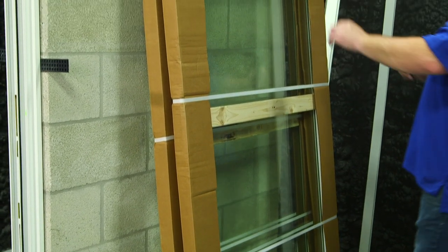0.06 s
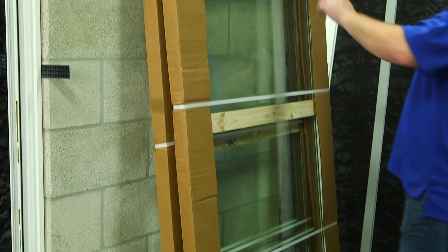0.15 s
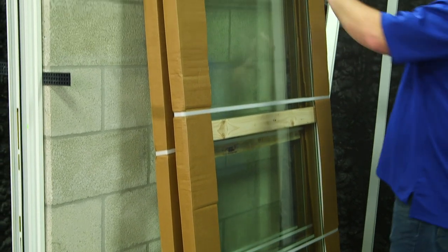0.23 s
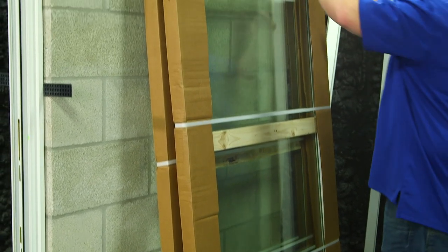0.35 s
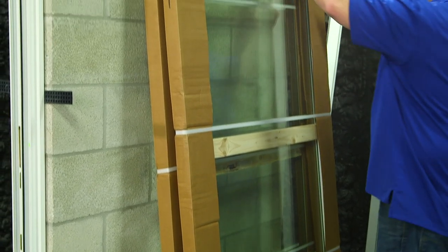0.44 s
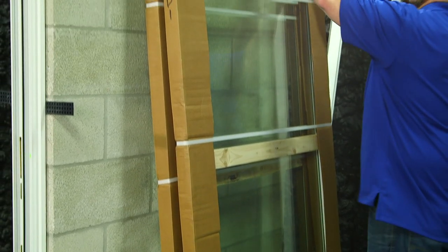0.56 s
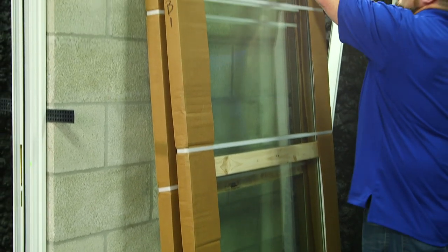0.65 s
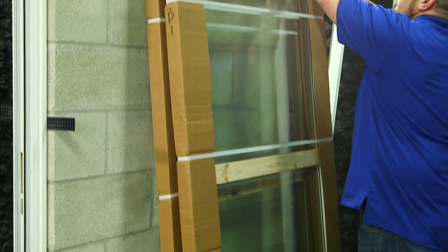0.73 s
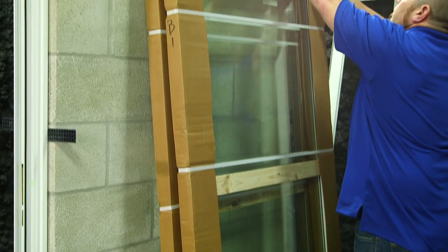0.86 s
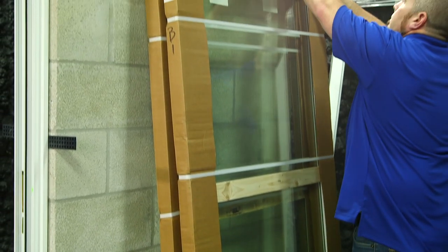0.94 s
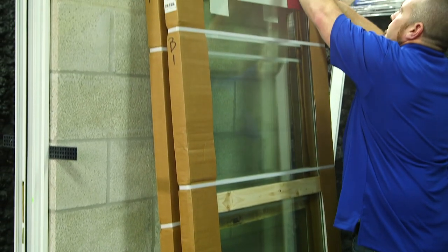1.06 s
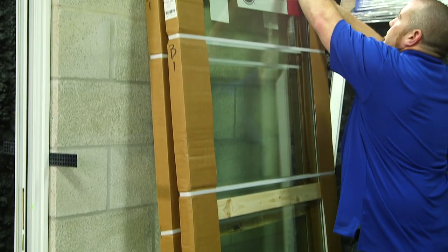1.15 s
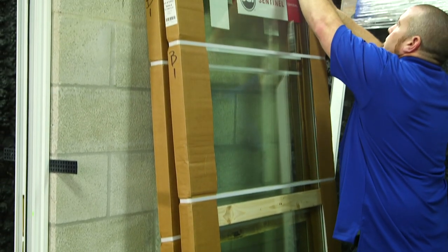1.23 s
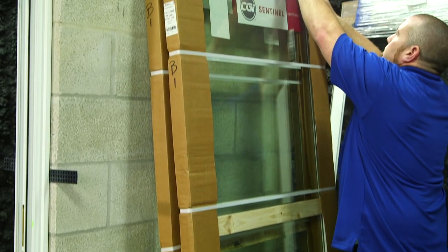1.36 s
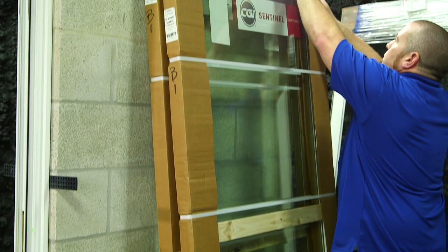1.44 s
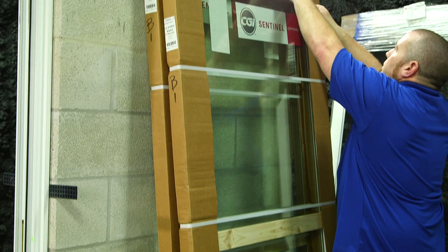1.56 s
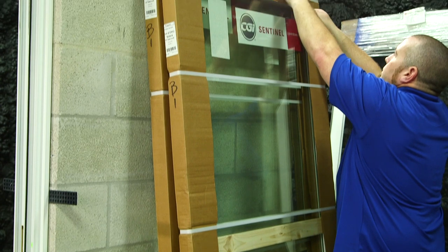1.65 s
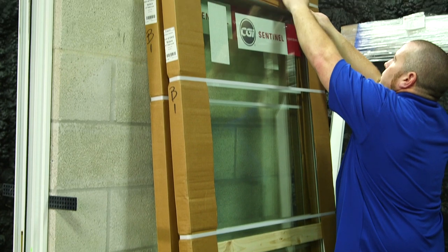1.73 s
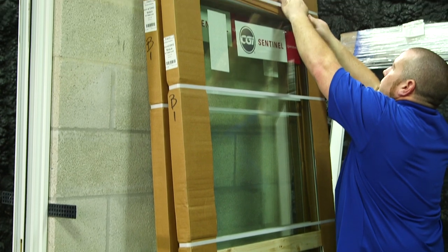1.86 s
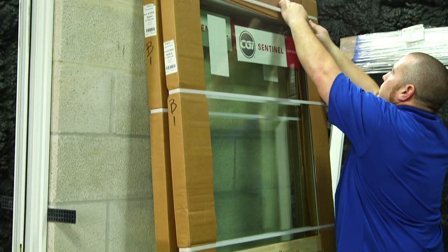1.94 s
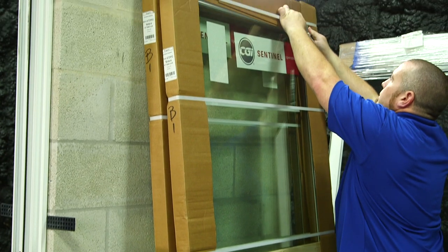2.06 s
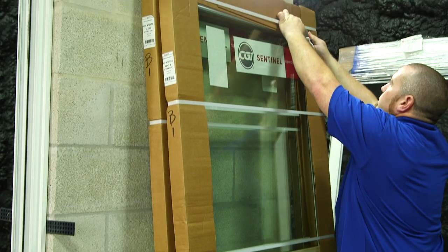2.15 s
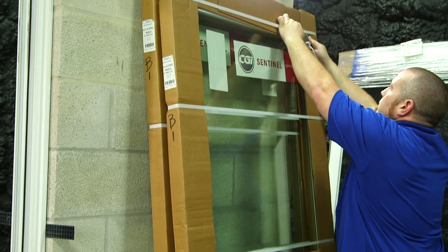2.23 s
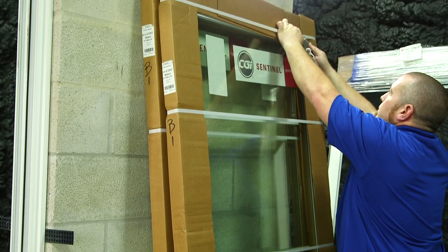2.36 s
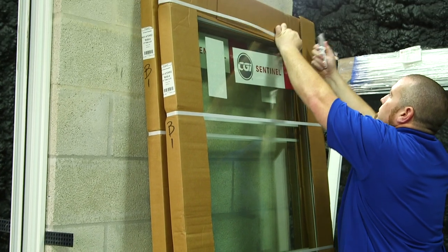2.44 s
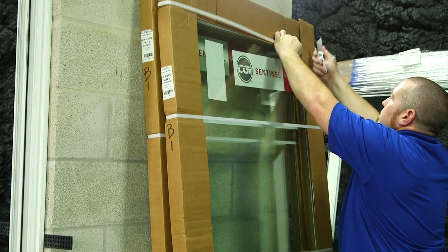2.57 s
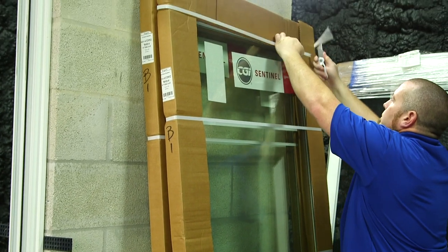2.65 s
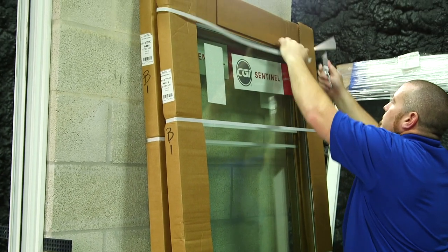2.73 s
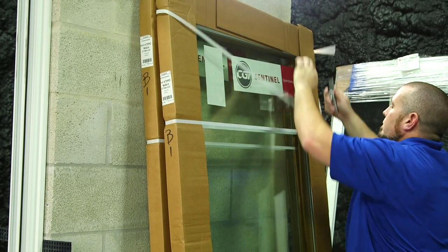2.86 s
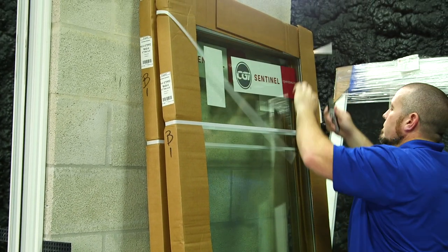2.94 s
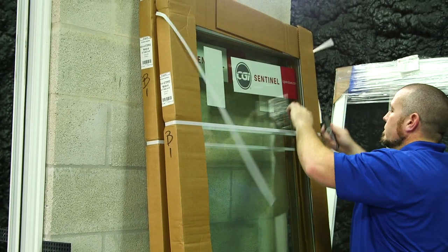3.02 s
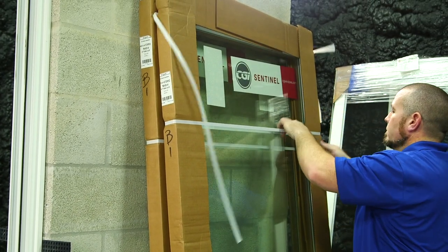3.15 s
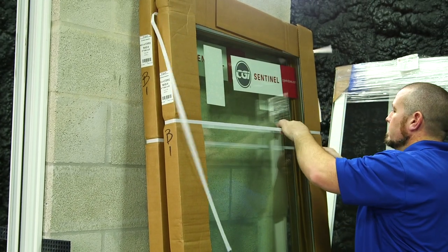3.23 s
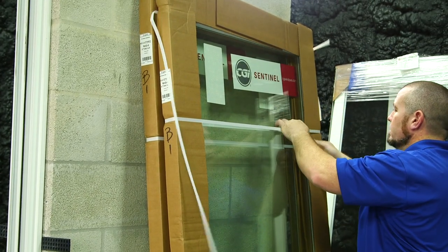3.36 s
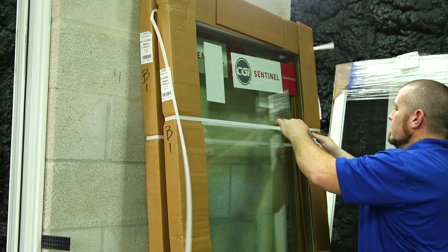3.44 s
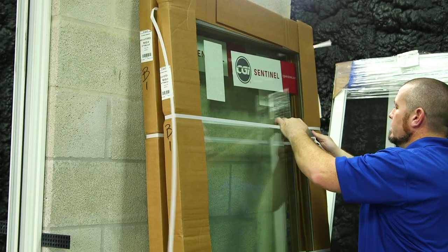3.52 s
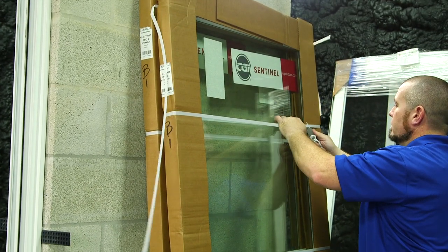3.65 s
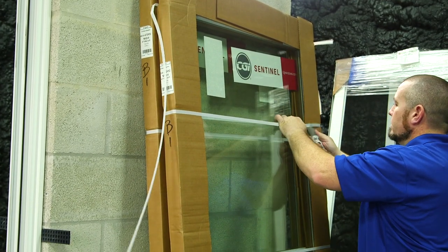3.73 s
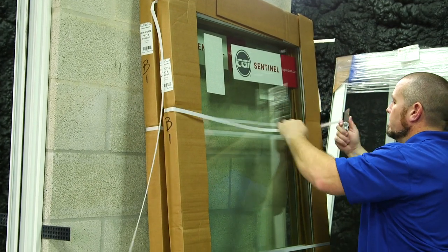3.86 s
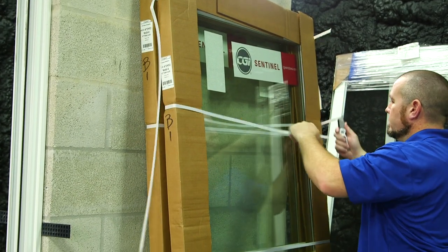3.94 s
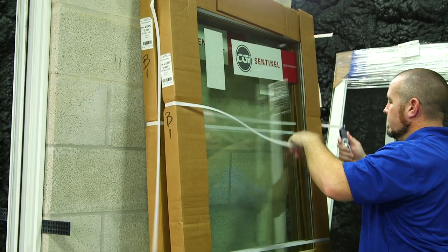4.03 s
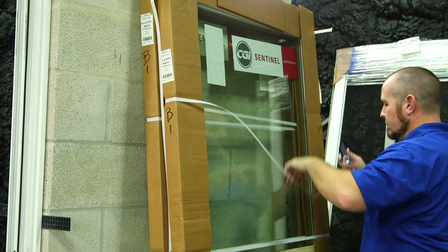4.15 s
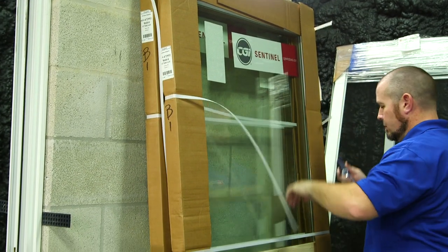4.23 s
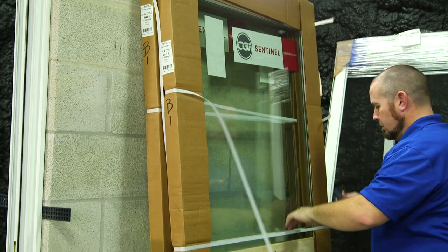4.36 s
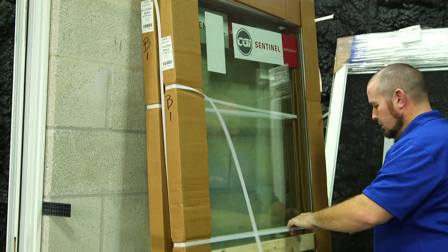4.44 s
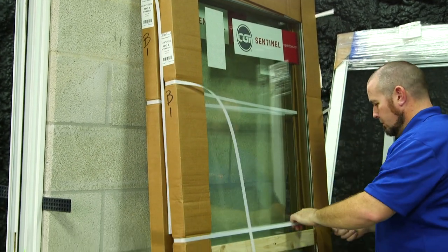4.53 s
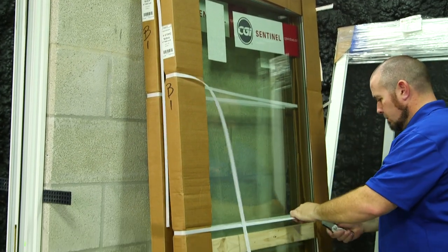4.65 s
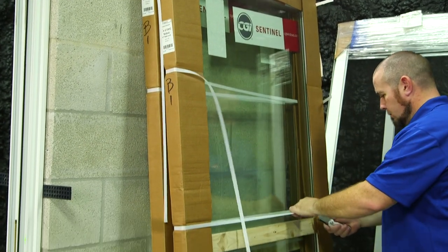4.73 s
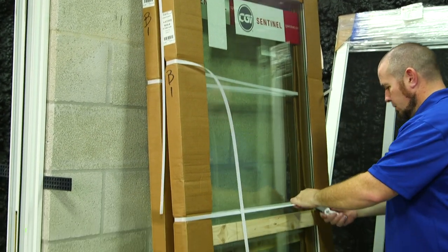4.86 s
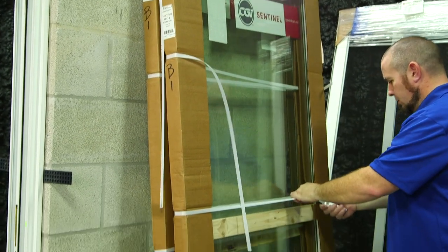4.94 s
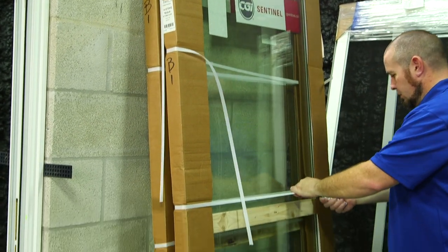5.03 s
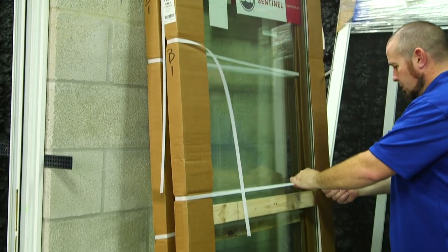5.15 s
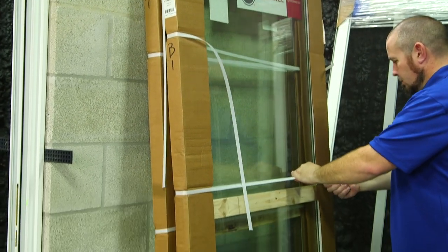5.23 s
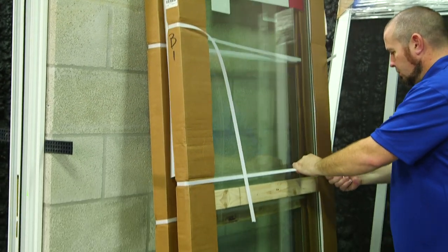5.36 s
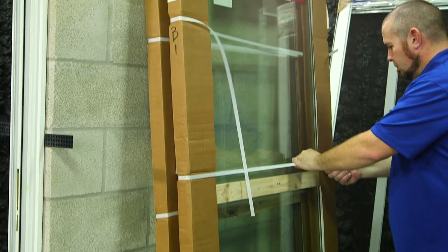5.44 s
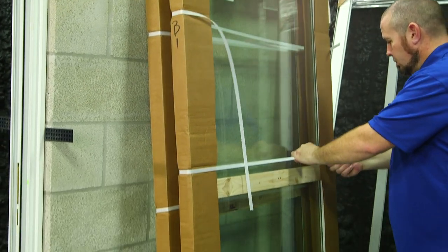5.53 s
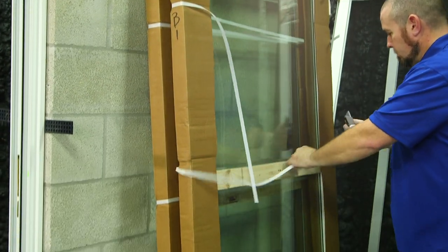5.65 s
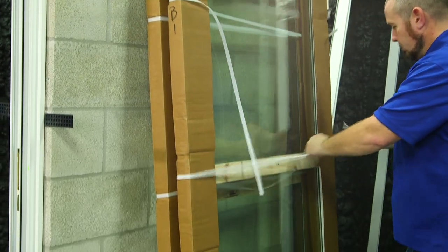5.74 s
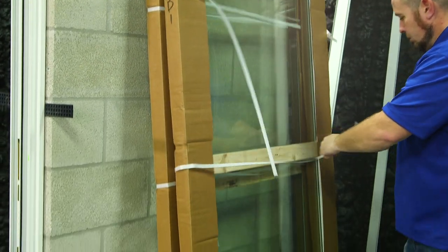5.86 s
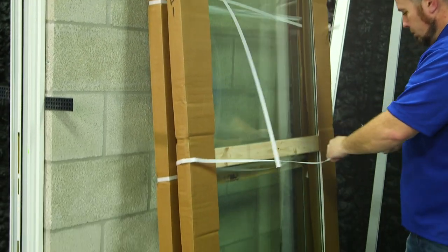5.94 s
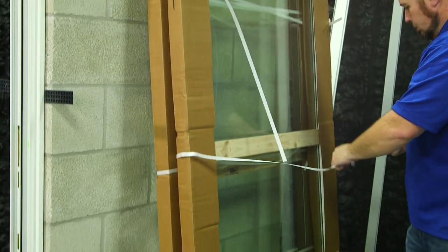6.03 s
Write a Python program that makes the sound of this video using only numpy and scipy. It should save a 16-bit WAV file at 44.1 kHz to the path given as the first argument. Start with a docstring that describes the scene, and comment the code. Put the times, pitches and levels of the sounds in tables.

```python
"""Indoors, in a block-walled room: a glazed door panel stands packed in cardboard and wooden slats.
Cutters click and three taut plastic bands burst free: slip grains whip round the cardboard, panel modes boom.
Contact impulses make the knocks of loose ends and slats; gated slip grains make slides, scrapes and creaks.
Behind the work lie the room's scattered reflections, shaped air noise and a low hum that swells and sinks.
One microphone channel takes it all, with a bass roll-off and rounded peaks."""
import sys
import numpy as np
from scipy import signal
from scipy.io import wavfile
from scipy.ndimage import uniform_filter1d

SR = 44100
rng = np.random.default_rng(int(sys.argv[2]) if len(sys.argv) > 2 else 0)


def inscribe(sig):
    """Save sig as 16-bit PCM at rate SR to the path in sys.argv[1].

    A 1-D sig is mono; a 2-D sig holds one channel per row.
    Samples are clipped to [-1, 1] before scaling.
    """
    pcm = np.round(np.clip(np.atleast_2d(sig).T, -1, 1) * 32767)
    wavfile.write(sys.argv[1], SR, pcm.astype(np.int16))


N = 268569
TIME = np.arange(N) / SR
RING = TIME[:SR]  # one second of time for a single event

# Bursts of the cut bands: (time [s], whip level [dB], swell time constant [s], t60 [s],
# panel boom level [dB], edge gain around 3.5 kHz [dB])
BAND_BURSTS = [(2.371, -17, 0.0018, 0.23, -26, -9), (2.393, -21, 0.0012, 0.18, -36, 2),
               (2.426, -17.5, 0.0022, 0.39, -69, 3.5), (3.775, -17, 0.00057, 0.44, -21, 8.5),
               (5.605, -14.5, 0.00044, 0.48, -18, 5)]
# Spectrum of the whipping band: (frequency [Hz], gain [dB])
WHIP_SPECTRUM = [(40, -44), (90, -7.5), (170, 4.5), (260, -17), (500, -13), (680, -14), (900, -10),
                 (1400, -10), (2200, -12), (3500, -22.5), (6000, -17), (11500, -11.5), (14000, -17),
                 (16000, -26)]
# Modes of the glazed panel: (frequency [Hz], level [dB], t60 [s])
PANEL_MODES = [(74, -14, .7), (91, 0, 1.15), (137, -9, .5), (178, -6, .3)]
# Band ends and slats knocking on the pack, levels relative to each layer's trim:
# (time [s], clack level [dB], thud level [dB], crack level [dB], clack pitch [Hz])
PACK_KNOCKS = [(0.136, -48, -39, -53, 930), (0.589, -27, -28, -37, 1630), (0.61, -29, -31, -55, 1020),
               (0.999, -19.5, -24.5, -37, 1480), (1.385, -23, -26, -27.5, 1270),
               (2.373, -35, -33, -21.5, 1560), (2.426, -11, -18.5, -13.5, 1180),
               (2.987, -35, -44, -32, 1120), (3.012, -33, -43, -29.5, 1140),
               (3.034, -29.5, -45, -29.5, 1700), (3.105, -27, -46, -32, 1560), (3.25, -13, -16, -18, 1560),
               (3.273, -19.5, -26, -38, 1380), (3.303, -29, -45, -30, 1260),
               (3.32, -19.5, -51, -23.5, 1210), (3.549, -35, -59, -50, 1250), (3.679, -32, -44, -45, 945),
               (3.701, -30.5, -40, -48, 1170), (3.79, -7.5, -19, -23, 900), (3.797, -7.5, -17.5, -31, 880),
               (3.876, -21.5, -53, -37, 1190), (3.951, -17, -53, -33, 1080), (3.963, -24, -31, -24, 1440),
               (4.132, -25, -30, -26, 1460), (4.383, -8.5, -32, -22.5, 1320), (4.39, -16, -30.5, -46, 1280),
               (4.416, -20.5, -29.5, -47, 1390), (4.444, -27.5, -51, -42, 1110),
               (4.467, -48, -30, -35, 1470), (4.728, -33.5, -40, -37.5, 940), (4.747, -45, -31.5, -43, 711),
               (4.872, -40, -44, -53, 1240), (4.936, -29.5, -52, -32.5, 935),
               (5.047, -37, -38.5, -53, 1070), (5.282, -31.5, -57, -30, 850),
               (5.526, -24.5, -37, -25.5, 1220), (5.621, -17, -14, -23, 820), (5.679, -28, -37, -36, 1300),
               (5.687, -42, -30, -15.5, 818), (5.759, -38, -42, -22, 1200), (5.8, -23, -24.5, -37, 1260),
               (5.812, -20, -23, -30, 1440), (5.834, -26, -19, -34, 1220), (5.845, -16, -26, -28, 1410),
               (5.861, -33, -24, -39, 1300), (5.882, -14, -25, -30, 1420), (5.927, -26, -32.5, -41, 1310),
               (5.982, -28.5, -44, -42, 1280), (6.024, -27, -55, -42, 1360)]
# Spectrum of the wooden thud: (frequency [Hz], gain [dB])
THUD_SPECTRUM = [(40, -39.5), (100, -4), (180, 5), (270, -2), (400, -5.5), (600, -7.5), (900, -12),
                 (2000, -65)]
# Spectrum of the plastic crack: (frequency [Hz], gain [dB])
CRACK_SPECTRUM = [(700, -17), (1800, -9), (2500, 15.5), (4300, 10), (6000, 14.5), (10000, -4)]
# Spectrum of the crack's fizz: (frequency [Hz], gain [dB])
FIZZ_SPECTRUM = [(2000, -50.5), (5000, 3.5), (7500, 11.5), (11000, 4), (16000, -10.5)]
# Resonances of the pack's wood and cardboard: (frequency [Hz], width [Hz], gain [dB])
PACK_RESONANCES = [(330, 40, -2), (407, 36, 4), (634, 40, -1), (862, 44, 1), (1362, 80, -1), (1945, 60, -3),
                   (2912, 70, -2), (4238, 120, -3)]
# The slat rocking against the panel: (time [s], level before trim [dB])
SLAT_SHOVES = [(1.001, -38), (5.8, -15), (5.837, -15), (5.879, -17.5), (5.952, -24.5), (6.072, -33)]
# Modes of the slat: (frequency [Hz], level [dB], t60 [s])
SLAT_MODES = [(132, 0, .24), (152, -9, .15), (205, -10, .12)]
# Clicks of cutters and band edges: (time [s], level before trim [dB], pitch [Hz])
CUTTER_CLICKS = [(0.671, -34, 10200), (0.8358, -29.5, 8100), (0.9595, -21, 8800), (1.0106, -23, 8300),
                 (1.6535, -20, 12800), (1.8392, -31, 11000), (1.9364, -18.5, 14000), (2.3942, -10, 10000),
                 (2.4124, -10, 10500), (2.4185, -13, 9500), (2.6962, -15, 12900), (3.264, -26, 9100),
                 (3.2685, -19, 11000), (3.679, -14, 10700), (4.132, -14.5, 9180), (4.151, -17, 10100),
                 (5.1788, -21.5, 9400), (5.471, -19.5, 9100), (5.5261, -15, 13400), (5.5723, -21, 13600),
                 (5.8282, -16.5, 10400)]
# Spectrum of a click's tick: (frequency [Hz], gain [dB])
TICK_SPECTRUM = [(200, -9), (1300, 3.5), (3000, -11.5), (6500, 3), (12000, 3), (16000, -4)]
# Band and hands sliding on cardboard, levels before trim: (time [s], length [s],
# swell over the stroke [dB], hollow rasp level [dB], edge hiss level [dB], drag level [dB])
SLIDE_STROKES = [(0.83, 0.057, -3, -50.5, -47, -48.5), (0.89, 0.12, 5, -36, -36, -36.5),
                 (1.0, 0.068, -5, -45, -54, -31), (1.02, 0.35, 0, -39.5, -41.5, -45),
                 (1.175, 0.045, 7, -32, -34, -37), (1.28, 0.033, 6, -33, -39.5, -36.5),
                 (1.378, 0.071, 0.5, -39, -38.5, -37.5), (1.46, 0.16, -4, -49, -47.5, -50),
                 (1.615, 0.045, 12, -45.5, -43.5, -50.5), (1.67, .16, 10, -40.5, -46.5, -51.5),
                 (1.83, 0.061, -10, -43.5, -48.5, -53), (2.003, 0.11, -4.5, -44, -41.5, -50),
                 (2.652, 0.029, 5, -45.5, -39, -39), (2.685, 0.082, -11, -46, -39.5, -42.5),
                 (3.008, 0.039, 1, -36.5, -37.5, -41), (3.06, 0.22, 11, -51, -49, -52.5),
                 (3.25, 0.17, -8, -44.5, -41.5, -50.5), (3.405, 0.083, 13.5, -41.5, -39, -48.5),
                 (3.735, 0.05, 8, -47, -45.5, -55), (3.96, 0.23, 2, -44, -50, -50),
                 (4.125, 0.029, 0, -34.5, -50, -40.5), (4.17, 0.16, 0, -50.5, -54.5, -51),
                 (4.412, 0.064, -12, -34.5, -47.5, -43.5), (4.475, 0.095, -4, -53, -57, -52.5)]
# Resonances of the hollow cardboard edge: (frequency [Hz], width [Hz], gain [dB])
CARDBOARD_RESONANCES = [(1068, 52, 3.5), (1233, 190, 2.5), (1392, 230, 8), (1654, 480, -7.5),
                        (2014, 140, -4)]
# Spectrum of the hiss at the band's rim: (frequency [Hz], gain [dB])
HISS_SPECTRUM = [(1470, -39), (2500, -5), (2940, -9), (4510, -4), (6110, 3), (8660, 7.5), (11800, 1.5),
                 (13100, 2), (16000, -5)]
# Spectrum of the low drag: (frequency [Hz], gain [dB])
DRAG_SPECTRUM = [(100, -6.5), (170, 2), (250, 4), (340, -8), (460, 0.5), (540, 3.5), (610, 2), (710, -6),
                 (1500, -33)]
# Packing scraping against the frame: (time [s], length [s], swell over the stroke [dB], level before trim [dB])
SCRAPE_STROKES = [(4.695, 0.057, -9, -45), (5.27, 0.23, -8, -42.5), (5.455, 0.14, 1.5, -37.5),
                  (5.735, 0.043, -2, -31), (5.775, 0.13, -6, -24), (5.87, 0.28, -3, -38.5)]
# Spectrum of the scrape: (frequency [Hz], gain [dB])
SCRAPE_SPECTRUM = [(120, -29), (200, -5), (373, -11.5), (409, -7.5), (590, -12.5), (696, -10.5),
                   (883, -10.5), (1320, -4), (1530, -8.5), (1980, -13), (5520, -30), (10900, -29.5),
                   (16000, -37)]
# Short cracks of knocks, and longer creaks and chirps of band edges:
# (time [s], level [dB], pitch [Hz], t60 [s])
CRACKS_AND_CREAKS = [(4.380, -35, 4080, 0.024), (4.525, -48, 4600, 0.08), (4.55, -45.5, 3540, 0.044),
                     (4.657, -46, 4800, 0.036), (4.705, -43, 3240, 0.053), (5.283, -36.5, 3740, 0.2),
                     (5.396, -46, 2550, 0.12), (5.466, -36.5, 2770, 0.29), (5.799, -20, 2900, 0.02),
                     (5.93, -31.5, 2720, 0.014)]
# Spectrum of the steady air noise: (frequency [Hz], gain [dB])
AIR_SPECTRUM = [(15, -63), (25, -69), (68, -9.5), (114, 5.5), (373, -15), (503, -15), (714, -17.5),
                (1160, -14.5), (1260, -18.5), (1370, -17.5), (2550, -20), (3160, -19.5), (4870, -22),
                (8360, -21), (16000, -23.5)]
# Level of the low hum, which swells and sinks: (time [s], level [dB])
HUM_LEVEL = [(0, -52), (2.3, -58), (3.05, -44), (3.4, -56), (4.0, -44), (6.09, -45.5)]
# Reverberation time of the room: (frequency [Hz], t60 [s])
ROOM_DECAY = [(100, 0.9), (500, 0.29), (1500, 0.39), (5000, 0.48), (10000, 0.19), (16000, 0.4)]

AIR_DB = -46
KNOCK_T60_S = 0.03  # chatter of a contact
BOOM_SWELL_S = 0.029  # time constant: the heavy panel takes a moment to get going
ATTACK_SHARE = 0.13  # share of a stroke spent taking hold: slow strokes start gently
RELEASE_S = 0.0056  # time constant of letting go
EDGE_HZ = 16000  # band limit of the microphone chain


def snaps(whip_db=0):
    """A released band zips round the cardboard corners as a dense run of slips, quick to swell and dying away."""
    out = np.zeros(N)
    for s, level_db, swell_s, t60, _, edge_db in BAND_BURSTS:
        slips = grains(len(RING), per_s=20000, spread_db=3.4)
        whip = patchy(in_pack(colour(slips, WHIP_SPECTRUM)), depth_db=1.5)
        whip = unit(colour(whip, [(1500, 0), (3500, edge_db), (7000, 0)]))
        swell = 1 - np.exp(-RING / max(swell_s, 1e-4))
        add(out, s, amp(level_db + whip_db) * whip * dying(t60) * swell)
    return out


def knocks(clack_db=-3, thud_db=-1, crack_db=-3, fizz_db=-8.0, width_hz=420):
    """Each blow gives a hollow cardboard clack, a wooden thud and a bright plastic crack with its fizz."""
    out = np.zeros(N)
    for s, clack_level, thud_level, crack_level, hz in PACK_KNOCKS:
        force = contact(KNOCK_T60_S, chatter=0.18)
        thud_force = contact(1.04 * KNOCK_T60_S, chatter=0.29)
        hollow = resonate(resonate(force, hz, width_hz), hz, 6.9 * width_hz)
        clack = crest(in_pack(hollow))
        thud = crest(in_pack(colour(thud_force, THUD_SPECTRUM)))
        crack = crest(in_pack(colour(force, CRACK_SPECTRUM)))
        fizz = crest(colour(force, FIZZ_SPECTRUM))
        add(out, s, amp(clack_level + clack_db) * clack)
        add(out, s, amp(thud_level + thud_db) * thud)
        add(out, s, amp(crack_level + crack_db) * crack)
        add(out, s, amp(crack_level + fizz_db) * fizz)  # the fizz follows the crack's level
    return out


def booms(panel_db=-1.0, slat_db=-2):
    """The unloaded panel swings back in low damped modes after each cut, and the slat rocks against it."""
    out = np.zeros(N)
    swing_up = 1 - np.exp(-RING / BOOM_SWELL_S)
    for s, _, _, _, boom_db, _ in BAND_BURSTS:
        add(out, s, amp(boom_db + panel_db) * ring(PANEL_MODES) * swing_up)
    for s, shove_db in SLAT_SHOVES:
        add(out, s, amp(shove_db + slat_db) * ring(SLAT_MODES))
    return out


def clicks(level_db=-6, ring_db=7, width_hz=2000):
    """Cutters and band edges make short contacts with a bright, quickly damped ring."""
    out = np.zeros(N)
    for s, click_db, hz in CUTTER_CLICKS:
        tick = colour(contact(0.01, chatter=0.2), TICK_SPECTRUM)
        bright = amp(ring_db) * resonate(tick, hz, width_hz)
        add(out, s, amp(click_db + level_db) * crest(tick + bright))
    return out


def slides(uneven_db=1.9, rasp_db=0, hiss_db=0, drag_db=-1, scrape_db=-1.0, crinkle_db=-6):
    """Stick-slip grains sound the hollow cardboard edge and hiss at the band's rim; coarser ones scrape."""
    wander = unit(uniform_filter1d(rng.standard_normal(N), size=350))
    grip = amp(uneven_db * wander)  # the grip tightens and eases
    slips = grains(N, per_s=9000, spread_db=4.15) * grip

    hollow = np.zeros(N)
    for hz, width_hz, gain_db in CARDBOARD_RESONANCES:
        hollow += amp(gain_db) * resonate(resonate(slips, hz, width_hz), hz, 3 * width_hz)
    rasp = unit(hollow) * strokes(SLIDE_STROKES, level_column=3) * amp(rasp_db)

    crinkles = amp(crinkle_db) * grains(N, per_s=240, spread_db=2.2)  # the band catches on single fibres
    rim = patchy(colour(slips + crinkles, HISS_SPECTRUM), depth_db=2.3)
    hiss = unit(rim) * strokes(SLIDE_STROKES, level_column=4) * amp(hiss_db)

    drag = unit(colour(slips, DRAG_SPECTRUM)) * strokes(SLIDE_STROKES, level_column=5) * amp(drag_db)

    coarse = colour(grains(N, per_s=2200, spread_db=1.6), SCRAPE_SPECTRUM)
    scrape = unit(patchy(coarse, depth_db=2.5)) * strokes(SCRAPE_STROKES) * amp(scrape_db)
    return rasp + hiss + drag + scrape


def cracks_and_creaks(level_db=0, width_hz=450):
    """Dying runs of slips ring at one pitch: brief ones crack, longer ones creak and chirp."""
    out = np.zeros(N)
    for s, event_db, hz, t60 in CRACKS_AND_CREAKS:
        slips = grains(len(RING), per_s=2000, spread_db=2.0) * dying(t60)
        pitched = resonate(resonate(slips, hz, width_hz), hz, 5500)
        add(out, s, amp(event_db + level_db) * crest(pitched))
    return out


def air_and_hum(waver=0.12, hum_hz=101.5, drift_width_hz=8.9):
    """Steady coloured air noise, and a low sine hum made to waver by narrow noise at its own pitch."""
    air = amp(AIR_DB) * unit(colour(rng.standard_normal(N), AIR_SPECTRUM))
    noise = rng.standard_normal(N)
    drift = unit(resonate(resonate(noise, hum_hz, drift_width_hz), hum_hz, drift_width_hz))
    hum = unit(np.sin(2 * np.pi * hum_hz * TIME) + waver * drift)
    hum_db = np.interp(TIME, *np.transpose(HUM_LEVEL))
    return air + hum * amp(hum_db)


def room(x, delay_s=0.0077):
    """Scattered reflections follow after a short gap, each band dying at its own speed."""
    taps = grains(SR, per_s=3000, spread_db=4.2) * (RING > delay_s)
    hz, t, z = signal.stft(taps, SR, nperseg=256)
    decay = amp(-60 * t / read(ROOM_DECAY, hz)[:, None])
    tail = signal.istft(z * decay, SR, nperseg=256)[1]
    return signal.fftconvolve(x, tail / np.linalg.norm(tail))[:N]


def in_pack(x):
    """Adds the resonances of the packed panel to a sound."""
    return x + sum(amp(db) * resonate(x, hz, width) for hz, width, db in PACK_RESONANCES)


def patchy(x, depth_db, frames=7, bins=4):
    """The contact point wanders, so narrow bands swell and fade for tens of milliseconds."""
    z = signal.stft(x, SR, nperseg=256)[2]
    patches = uniform_filter1d(rng.standard_normal(z.shape), frames, axis=1)
    patches = uniform_filter1d(patches, bins, axis=0)
    return signal.istft(z * amp(depth_db * unit(patches)), SR, nperseg=256)[1][:len(x)]


def strokes(rows, level_column=3):
    """Gain over time: each stroke takes hold, swells or fades steadily in decibels, and lets go."""
    power = np.zeros(N)
    for row in rows:
        s, length, swell_db = row[:3]
        progress = np.minimum(RING / length, 1)
        attack = np.minimum(progress / ATTACK_SHARE, 1)
        hold = amp(row[level_column] + swell_db * (progress - .5))
        release = np.exp(-np.maximum(RING - length, 0) / RELEASE_S)
        add(power, s, (attack * hold * release) ** 2)  # overlapping strokes add in power
    return np.sqrt(power)


def contact(t60, chatter):
    """One sharp contact followed by dying chatter."""
    force = chatter * rng.standard_normal(len(RING)) * dying(t60)
    force[0] += 1
    return force


def grains(length, per_s, spread_db):
    """Random tiny slips of either sign, a few much larger than the rest."""
    sizes = amp(spread_db * np.minimum(rng.exponential(1, length), 4))
    signs = rng.choice([-1, 1], length)
    happens = rng.random(length) < per_s / SR
    return unit(sizes * signs * happens)


def ring(modes):
    """Damped modes set going by one push, faded to silence within the second."""
    swing = sum(amp(db) * dying(t60) * np.sin(2 * np.pi * hz * RING) for hz, db, t60 in modes)
    return crest(swing * (1 - RING), size=600)


def dying(t60):
    """Exponential decay, 60 dB down after t60 seconds."""
    return np.exp(-np.log(1000) * RING / max(t60, 1e-3))


def resonate(x, hz, width_hz):
    """One resonance with gain 1 at its centre."""
    hz = min(hz, SR / 2 - 1000)
    return signal.lfilter(*signal.iirpeak(hz, hz / width_hz, SR), x)


def colour(x, points, size=4096):
    """Causal, minimum-phase filter with the given spectrum."""
    gain_db = np.maximum(read(points, abs(np.fft.fftfreq(size, 1 / SR))), -100)
    log_gain = np.log(amp(gain_db))
    spectrum = np.exp(np.conj(signal.hilbert(log_gain)))  # the Hilbert transform supplies the phase
    taps = np.fft.ifft(spectrum).real[:size // 2]
    return signal.oaconvolve(x, taps)[:len(x)]


def read(points, hz):
    """Joins (frequency [Hz], value) points on a log-frequency axis."""
    f, value = np.transpose(points)
    return np.interp(np.log(hz + 1), np.log(f), value)


def amp(db):
    """Decibels to gain."""
    return 10 ** (np.asarray(db) / 20)


def unit(x):
    """Scales to rms 1."""
    return x / np.sqrt(np.mean(x ** 2) + 1e-20)


def crest(x, size=176):
    """Scales so that the loudest stretch of size samples (a few milliseconds) has rms 1."""
    return x / np.sqrt(uniform_filter1d(x ** 2, size).max() + 1e-20)


def add(mix, s, sound):
    """Mixes a sound in at time s [s]."""
    part = mix[max(round(s * SR), 0):][:len(sound)]
    part += sound[:len(part)]


def scene(knock_room_db=-12, click_room_db=-12, rub_room_db=-12):
    """The work on the pack in a block-walled room; booms, air and hum get no added reflections."""
    blows = knocks()
    ticks = clicks()
    rubs = snaps() + slides() + cracks_and_creaks()
    echo = room(amp(knock_room_db) * blows + amp(click_room_db) * ticks + amp(rub_room_db) * rubs)
    return (blows + ticks + rubs + booms() + echo + air_and_hum())[None]


def record(dry, low_cut_hz=62):
    """The microphone's bass roll-off, soft overload on the highest peaks and the band limit."""
    bass_cut = signal.butter(3, low_cut_hz, "highpass", fs=SR, output="sos")
    thin = signal.sosfilt(bass_cut, dry)
    rounded = thin / (1 + (thin / .6) ** 4) ** .25  # peaks level off towards 0.6
    band_limit = signal.firwin(511, EDGE_HZ, window=("kaiser", 9), fs=SR)
    return signal.oaconvolve(rounded, band_limit[None], "same")


dry = scene()
out = record(dry)
inscribe(out)
```